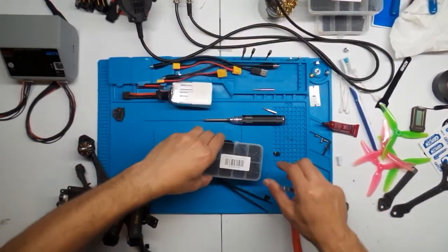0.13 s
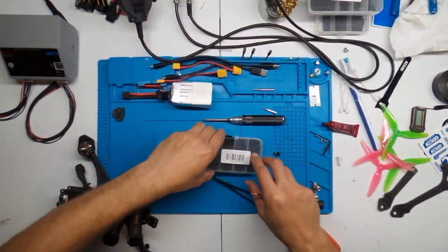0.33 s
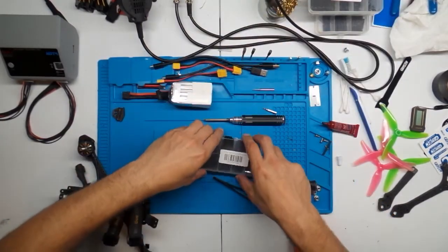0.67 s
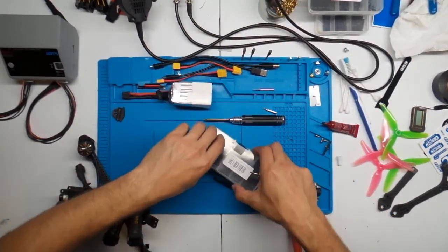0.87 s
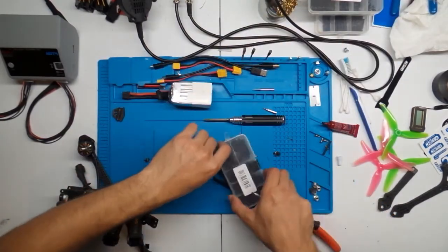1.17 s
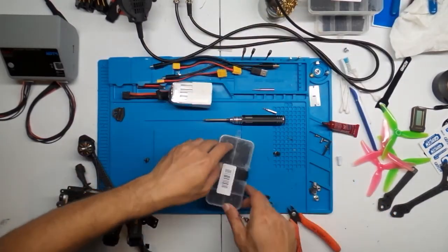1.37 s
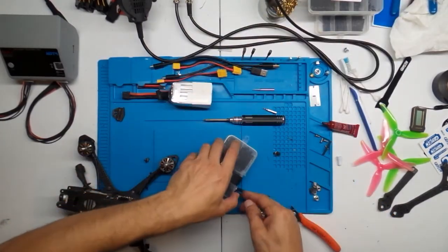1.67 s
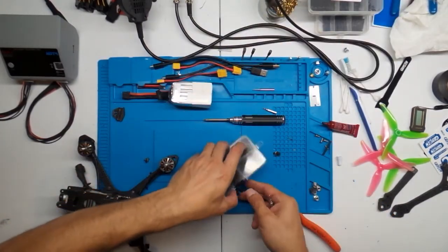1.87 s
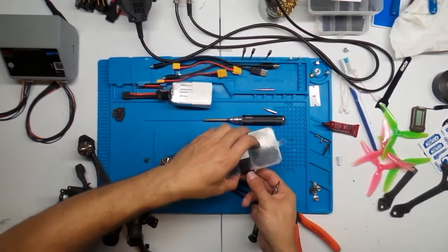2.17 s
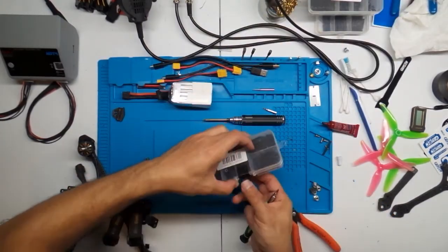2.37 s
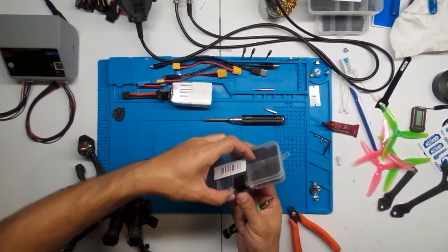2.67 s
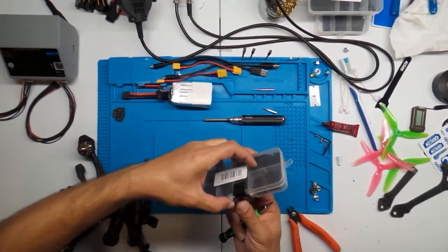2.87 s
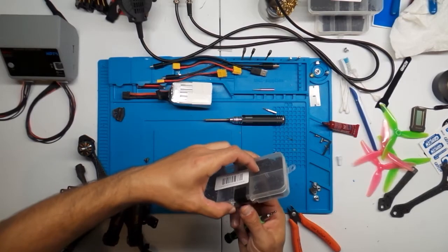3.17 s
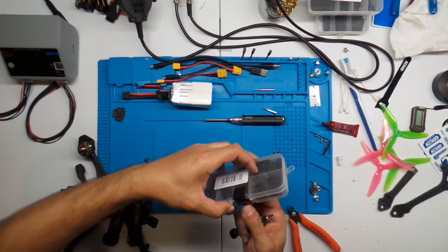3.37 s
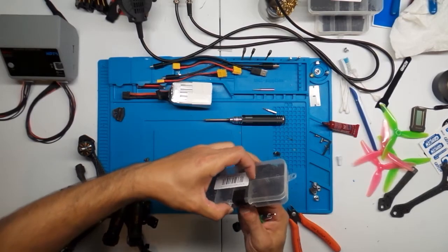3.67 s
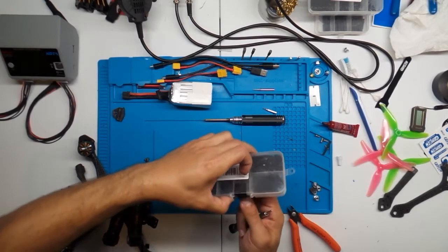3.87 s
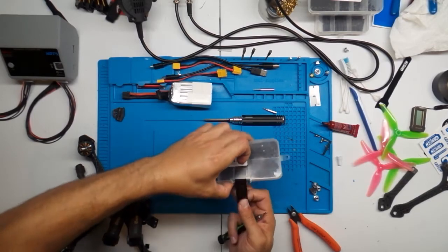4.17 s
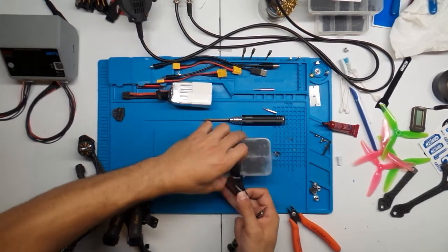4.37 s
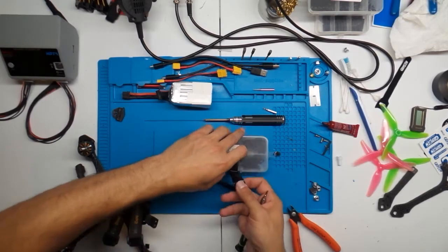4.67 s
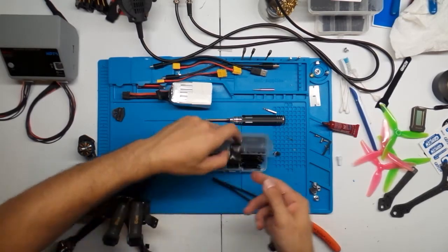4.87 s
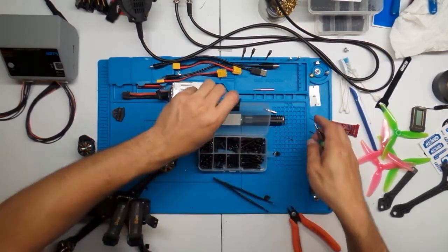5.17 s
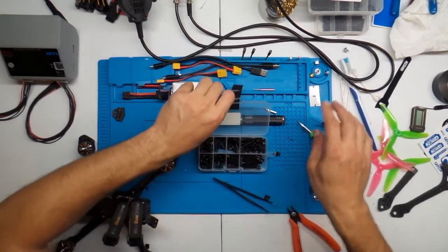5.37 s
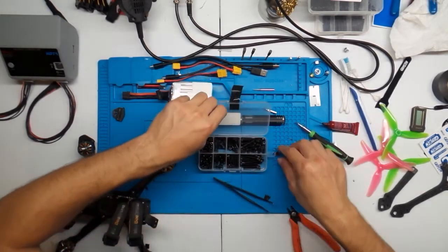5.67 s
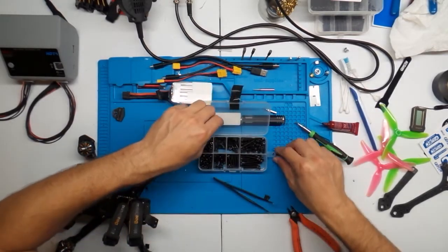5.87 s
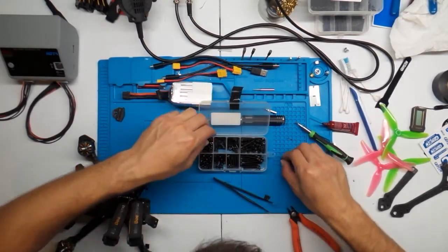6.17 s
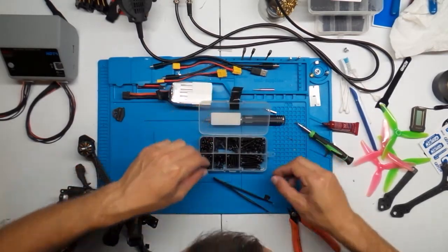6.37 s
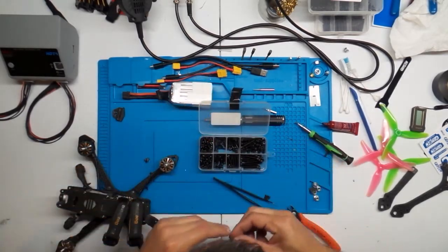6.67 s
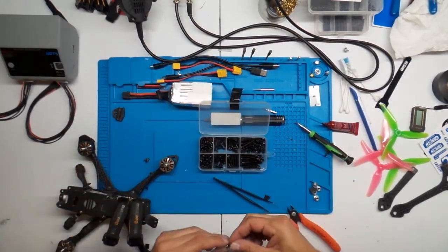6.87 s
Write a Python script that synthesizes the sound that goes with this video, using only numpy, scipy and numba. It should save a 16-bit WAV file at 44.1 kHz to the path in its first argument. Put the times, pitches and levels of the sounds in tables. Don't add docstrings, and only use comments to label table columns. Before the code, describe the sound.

Close in a small room, a plastic box of tiny screws is slid and knocked on a matted desk with soft thuds and a brief rattle. After a quieter patch come brittle clicks and bright ticks as fingers work the catch. The box is set down, then a loud clack and thud with a burst of rattling screws marks the lid falling open. Faint fumbling follows over low rumble and hiss.

```python
import sys
import numpy as np
from scipy import signal
from scipy.fft import rfft, irfft
from scipy.io import wavfile
from numba import njit

SR = 44100
rng = np.random.default_rng(int(sys.argv[2]) if len(sys.argv) > 2 else 0)


def amplitude_ratio(level_db):
    exponent = np.asarray(level_db, float) / 20
    return 10 ** exponent


def transcribe(u):
    v = np.clip(np.atleast_2d(u).T, -1, 1)
    q = np.round(v * 32767).astype(np.int16)
    wavfile.write(sys.argv[1], SR, q)


N = 308859


@njit
def ring(start, hz, t60, size):
    out = np.zeros(N)
    for k in range(len(start)):
        pole = np.exp((2j * np.pi * hz[k] - np.log(1000) / t60[k]) / SR)
        z = size[k] + 0j
        for i in range(int(start[k]), min(int(start[k] + t60[k] * SR), N)):
            out[i] += z.imag
            z *= pole
    return out


def ring_all(start, hz, t60, size):
    return ring(start.ravel(), hz.ravel(), t60.ravel(), size.ravel())


def band(x, lo_hz, hi_hz):
    return signal.sosfilt(signal.butter(2, [lo_hz, hi_hz], "band", fs=SR, output="sos"), x)


def high_pass(x, order, hz):
    return signal.sosfilt(signal.butter(order, hz, "high", fs=SR, output="sos"), x)


def spells(t, s, db, rise_s, hold_s, t60):
    age = t - s[:, None]
    rise_s, hold_s, t60 = (np.maximum(v + 0 * s, 1e-3)[:, None] for v in (rise_s, hold_s, t60))
    rise_db = -9 * np.clip(1 - age / rise_s, 0, 1)
    fade_db = -60 * np.maximum(age - rise_s - hold_s, 0) / t60
    gain = amplitude_ratio(db[:, None] + rise_db + fade_db) * (age >= 0)
    return np.sqrt(np.sum(gain ** 2, axis=0))


def air():
    # (frequency [Hz], density [dB per Hz])
    hush_spectrum = [(35, -34), (60, 6), (211, -5), (273, -5), (489, -7), (817, -13.5), (897, -15.5),
                     (985, -12), (1720, -17), (3990, -21), (15800, -25)]
    hz, db = np.transpose(hush_spectrum[1:])
    f = np.maximum(np.fft.rfftfreq(N, 1 / SR), 1)
    hush = irfft(rfft(rng.standard_normal(N)) * amplitude_ratio(np.interp(np.log(f), np.log(hz), db)), N)
    swell_db = np.interp(np.arange(N), np.linspace(0, N, 40), rng.standard_normal(40))
    hush = hush + (amplitude_ratio(swell_db) - 1) * band(hush, 40, 1500)
    hush = high_pass(hush, 3, 62)
    still_s, still_db = 6.3, -3
    rest = np.clip((np.arange(N) / SR - still_s) / 0.147, 0, 1)
    return hush * amplitude_ratio(-66.5 + still_db * rest) / hush.std()


def desk():
    # (frequency [Hz], level [dB], t60 [s])
    desk_modes = [(64.2, -6.5, 0.23), (93, 1, 0.09), (134, 9.5, 0.11), (161, -2, .1), (194, 1.5, 0.14),
                  (246, -2.5, 0.049), (323.1, 6, 0.143), (430, -20, .07), (497, -16, 0.0268)]
    # (time [s], peak level [dB], contact time [ms])
    thuds = [(0.283, -34.5, 0.85), (0.316, -29, 4.1), (0.445, -32.5, 2.8), (0.752, -45, 6),
             (1.061, -64, 2.8), (1.137, -46, 2.5), (1.194, -40, 1.6), (1.23, -46, 0.52),
             (1.283, -35.5, 0.38), (1.847, -50, 1.7), (4.516, -35, 0.82), (4.529, -31, 2.8),
             (5.331, -24.5, .9), (5.346, -55, 0.74), (5.367, -24, 2.1), (5.41, -21.5, 1.2)]
    # (time of hardest rub [s], level [dB], build-up [s], fading t60 [s])
    drags = [(.3, -35.5, 0.021, 0.34), (.462, -37.5, .08, 0.57), (.6, -53, .1, 2.6),
             (1.077, -37, 0.038, 0.5), (1.288, -39, 0.2, 0.94), (1.824, -58.5, 0.27, 1.1),
             (2.558, -53.5, 0.24, 1.4), (2.93, -52.5, 0.16, 1.24), (3.658, -55, 0.053, 2.3),
             (4.2, -59.5, 0.17, 3), (4.532, -48, 0.046, 1.6), (5.334, -14, 0.0055, 0.45),
             (5.453, -24, 0.086, 0.43), (5.65, -58, 0.092, 1.8)]
    hz, db, t60 = np.transpose(desk_modes)
    body = ring(0 * hz, hz, t60, amplitude_ratio(db))[:SR // 2]
    push = np.zeros(N)
    for s, peak_db, ms in thuds:
        blow = np.hanning(max(int(ms * SR / 1000), 3) + 2)
        at = int((s + .004) * SR)
        push[at:at + len(blow)] += amplitude_ratio(peak_db - 13.5) * blow / blow.sum()
    s, drag_db, rise_s, fade_t60 = np.transpose(drags)
    rub_gain = spells(np.arange(N) / SR, s - rise_s, drag_db - 7.5, rise_s, 0, fade_t60)
    rub = rng.standard_normal(N) * rub_gain / np.sqrt(np.sum(body ** 2))
    return high_pass(signal.fftconvolve(push + rub, body)[:N], 4, 66)


def singing():
    # (time [s], level [dB], frequency [Hz], t60 [s], pitch spread [%])
    loose_parts = [(1.205, -70, 13400, 0.2, 1.2), (1.265, -64, 13610, .1, 1), (1.31, -65, 12600, 0.39, 1.6),
                   (1.461, -71, 12600, 0.29, 1.2), (1.349, -75, 5600, 0.13, 1), (1.34, -70, 3860, 0.4, 1.4),
                   (1.438, -67.5, 1626, 0.13, 1.8), (2.497, -72, 1630, 0.052, 2.9),
                   (3.687, -49.5, 7800, 0.057, 1.1), (3.759, -68, 6280, 0.23, 1.4),
                   (4.215, -55, 1800, .08, 3.5), (4.675, -60, 1075, 0.089, 11),
                   (5.53, -55.5, 1797, 0.4, 11), (5.764, -61, 1805, 0.09, 20),
                   (5.921, -55.5, 424, 0.07, 4.7)]
    s, db, hz, t60, spread = (c[:, None] for c in np.transpose(loose_parts))
    luck = rng.random((len(s), 2, 9))
    late_s = 0.5 * t60 * luck[:, 0] ** 2
    mode_hz = hz * (1 + spread * (luck[:, 1] - .5) / 50)
    size = amplitude_ratio(db + 2.0 - 40 * late_s / t60)
    return ring_all((s + late_s) * SR, mode_hz, 0.62 * t60 + 0 * late_s, size)


def clicks():
    # (time [s], peak level [dB], wall pitch [Hz], snap over peak [dB])
    knocks = [(1.049, -50, 1050, 0), (1.191, -33.5, 630, -4.5), (1.289, -20.5, 1130, -19),
              (1.79, -47, 1020, -16), (2.429, -44.5, 2700, 3), (2.52, -55, 1650, 12), (2.813, -47, 2110, 5),
              (2.845, -33.5, 1280, -5), (2.917, -27.5, 1020, -7), (4.131, -37.5, 830, 0.5),
              (4.391, -35, 846, -17), (5.265, -34.5, 1900, -12), (5.686, -52.5, 1470, 7),
              (5.766, -49, 1750, -4), (6.035, -54, 632, -8.5)]
    # (time [s], peak level [dB], wall pitch [Hz], snap over peak [dB])
    taps = [(0.081, -47.5, 5930, -15), (0.292, -27.5, 2314, -48), (0.386, -37.5, 925, -29),
            (0.671, -53.5, 1440, -7), (0.76, -38, 653, -25), (1.623, -46.5, 1560, -9.5),
            (2.488, -34, 2960, -18), (2.497, -30.5, 1654, -4), (2.552, -33.5, 5380, -13),
            (3.62, -29.5, 2330, -7), (3.758, -39, 6440, -11), (3.961, -52.5, 1870, -2),
            (4.36, -43, 2000, -7.5), (4.527, -31, 1660, -5.5), (4.584, -23.5, 656, -33),
            (4.599, -55, 650, -21), (4.632, -45, 710, -1), (5.082, -50, 645, -5), (5.331, -29.5, 514, -9),
            (5.363, -14, 2800, 4.5)]
    # (time [s], peak level [dB], wall pitch [Hz], snap over peak [dB])
    ticks = [(2.1, -51, 6060, -30), (2.739, -35.5, 6860, -6), (2.89, -38, 1620, -8),
             (2.904, -28, 2400, -6.5), (2.985, -36.5, 3520, -11.5), (3.295, -62.5, 970, 5),
             (3.451, -32, 6720, -9.5), (3.508, -56, 2220, -10), (3.608, -40.5, 1050, -8),
             (3.645, -34, 2050, -20), (3.651, -21, 2490, -18), (3.691, -31, 2360, -24),
             (3.889, -47.5, 3560, -8), (4.427, -39, 2400, -23), (4.76, -53, 1600, -14),
             (5.211, -56, 1420, -7), (6.268, -51, 840, -15)]
    snap_top_db = [-21.5, -2, 7]
    wall_t60_s = [.03, 0.049, 0.05]
    s, db, hz, mid_db = (c[:, None] for c in np.transpose(knocks + taps + ticks))
    kind = np.repeat(np.arange(3), [len(knocks), len(taps), len(ticks)])[:, None]
    top_db = mid_db + np.take(snap_top_db, kind)
    t60 = np.take(wall_t60_s, kind) * (hz / 1000) ** -0.78

    luck = rng.random((len(s), 4, 48))
    snap_hz = 1300 + 14700 * (np.arange(48) + luck[:, 0]) / 48
    snap_db = db + np.where(snap_hz < 5000, mid_db - 3.0, top_db - 7)
    snap_size = amplitude_ratio(snap_db) * (2 * luck[:, 1] - 1)
    snap_t60 = np.minimum(19.8 * (1 + 3 * luck[:, 2]) / snap_hz, .006)
    snap_start = (s + .001 + .003 * luck[:, 3] ** 2) * SR

    neighbour = np.arange(8) > 0
    chance = rng.standard_normal((len(s), 8)) * neighbour
    wall_hz = np.clip(hz * np.exp(0.313 * chance), 200, 15000)
    wall_size = amplitude_ratio(db - 9.0 - 9.0 * neighbour) * np.sign(chance + 1e-9)
    wall_start = np.where(neighbour, snap_start[:, :8], (s + 0.000986) * SR)
    wall_t60 = np.clip(t60, .004, .08) * np.minimum(hz / wall_hz, 1) * np.where(neighbour, .6, 1)
    wall = ring_all(wall_start, wall_hz, wall_t60, wall_size)
    return wall + ring_all(snap_start, snap_hz, snap_t60, snap_size)


def shaking(t, over_column, linger):
    # (time [s], tick level [dB], settling t60 [s], wall knock over it [dB], box hollow over it [dB])
    jolts = [(.295, -42.5, 0.27, -5, -2), (.77, -63.5, 0.47, -3, 6), (1.046, -55, 0.57, -0.5, 4),
             (1.2, -52, 0.43, -1, 0), (1.288, -48, 0.44, 2.5, 4.5), (1.43, -59.5, .6, 5, -4),
             (1.622, -75.5, 1, 8.5, 13.5), (4.695, -59, 0.32, 7.5, -12), (2.64, -59, 0.29, -1, -1.5),
             (2.74, -46.5, 0.13, -7, -4), (2.987, -63.5, 0.9, -18, -4), (3.453, -57, 0.35, -18, -11),
             (3.612, -66, 0.33, -11, -15), (3.657, -47, 0.29, -6, -13), (3.765, -53, 0.72, -23, -11),
             (4.131, -42, 0.29, 5.5, -6), (4.359, -47.5, 0.47, -2.5, -10), (4.54, -57, 0.53, 6, 4),
             (5.265, -59, 0.17, -4, -20), (5.333, -34.5, 0.28, -2, -10), (5.37, -26.5, 0.2, 1, -0.5),
             (5.398, -36.5, 0.5, 4, -3.5), (6.268, -58.5, 0.17, -4, -4.5)]
    # (start [s], length [s], tick level [dB], wall knock over it [dB], box hollow over it [dB])
    slides = [(0.391, 0.063, -63.5, 8.5, 15.5), (0.434, 0.027, -46.5, 8, 8.5), (0.464, 0.024, -31, -5, -12),
              (0.734, 0.033, -67, 6.5, 13), (0.857, 0.018, -61.5, -12, -2), (1.065, 0.015, -47.5, 3.5, 6),
              (1.185, 0.0098, -48.5, 0, -0.5), (4.522, 0.0094, -47.5, 5, 6.5), (1.778, 0.073, -67.5, 3, 0),
              (2.255, 0.033, -64, -2.5, 1), (2.396, 0.16, -54, -3, -4.5), (2.8, 0.053, -49, 0, -17),
              (2.835, 0.1, -44.5, 0, -17), (3.642, 0.058, -56.5, 6.5, -9), (4.124, 0.087, -42, -2, -9),
              (4.611, 0.16, -59.5, -1, -24), (4.907, 0.098, -64, -4, 0.5), (4.984, 0.24, -72.5, 2, -3),
              (5.705, 0.14, -68.5, -12, 3.5), (6.672, 0.053, -68.5, -2.5, -17), (6.977, 0.037, -60, -8, -4)]
    jolt, slide = np.transpose(jolts), np.transpose(slides)
    jolt_db, slide_db = jolt[1], slide[2]
    if over_column:
        jolt_db = jolt_db + jolt[over_column]
        slide_db = slide_db + slide[over_column]
    thrown = spells(t, jolt[0], jolt_db, 0.0012, 0, linger * jolt[2])
    rise_s, hold_s = 0.29 * slide[1], 0.71 * slide[1]
    slid = spells(t, slide[0], slide_db, rise_s, hold_s, linger * 0.12)
    return np.hypot(thrown, slid)


def tumble():
    # (low edge [Hz], high edge [Hz])
    rattle_bands = [
        (400, 1100),
        (1100, 4500),
        (4500, 16000),
    ]
    settle_factors = [
        1.056,
        1.03,
        0.99,
    ]
    # (time [s], frequency [Hz])
    wall_pitch = [(.28, 1970), (.6, 2050), (.72, 1180), (1.05, 2210), (1.272, 1100), (1.584, 1490),
                  (1.8, 1090), (2.4, 2070), (3.0, 1510), (3.45, 3120), (3.554, 2180), (3.832, 2170),
                  (4.13, 1070), (4.22, 1790), (4.64, 1080), (5.26, 2250), (5.462, 2070), (5.614, 1690)]
    knocks_per_s = 4500
    count = int(knocks_per_s * N / SR)
    start = np.sort(rng.integers(0, N, count))
    force = amplitude_ratio(2.5 * np.minimum(rng.exponential(size=count), 3))
    clump = np.clip(rng.standard_normal(N // 256 + 1), -2, 1.2)
    force = force * amplitude_ratio(5.0 * clump[start // 256])
    force = force / np.sqrt(np.mean(force ** 2))
    wall_hz = np.interp(start / SR, *np.transpose(wall_pitch))
    out = np.zeros(N)
    over_columns, mode_counts = (4, 3, 0), (1, 3, 4)
    for (lo, hi), column, modes, linger in zip(rattle_bands, over_columns, mode_counts, settle_factors):
        strength = shaking(start / SR, column, linger)
        for mode in range(modes):
            cycles = 2.6
            if column == 3 and mode > 0:
                hz = wall_hz * np.exp(0.14 * rng.standard_normal(count))
                cycles = 2.83
            elif column:
                hz = lo * (hi / lo) ** rng.random(count)
            else:
                hz = rng.uniform(lo, hi, count)
            t60 = cycles * (1 + rng.exponential(size=count)) / hz
            energy = knocks_per_s * modes * t60 / (4 * np.log(1000))
            size = strength * amplitude_ratio(-5.0) * force * rng.standard_normal(count) / np.sqrt(energy)
            out += ring(1. * start, hz, t60, size)
    return high_pass(out, 2, 445)


def room(dry):
    # (delay [ms], level [dB])
    reflections = [(1.4, -27.5), (4.2, -11), (7.5, -14), (11, -7.5)]
    # (centre [Hz], t60 [s], level [dB])
    tail_bands = [(276, 0.37, -19), (1030, 0.3, -7), (3580, 0.21, -1.5), (11050, 0.19, -5)]
    t = np.arange(SR * 3 // 4) / SR
    answer = np.zeros(len(t))
    answer[0] = 1
    for ms, db in reflections:
        answer[int(ms * SR / 1000)] += amplitude_ratio(db)
    for hz, t60, db in tail_bands:
        tail = band(rng.standard_normal(len(t)), hz / 2, min(2 * hz, .45 * SR))
        tail = tail * amplitude_ratio(-60 * t / t60) * np.minimum(t / 0.0013, 1)
        answer += tail * amplitude_ratio(db) * np.sqrt(min(3 * hz / SR, 1) / np.sum(tail ** 2))
    return signal.fftconvolve(dry, answer)[:N]


def scene():
    sources = desk() + singing() + clicks() + tumble()
    return (room(sources) + air())[None]


def band_limit(x):
    return signal.sosfilt(signal.butter(12, 16820, fs=SR, output="sos"), x)


def record(dry):
    rounded = .9 * np.tanh(dry / .9)
    top_cut = signal.ellip(6, .3, 22, 15900, fs=SR, output="sos")
    return band_limit(signal.sosfilt(top_cut, rounded))


dry = scene()
out = record(dry)
transcribe(out)
```